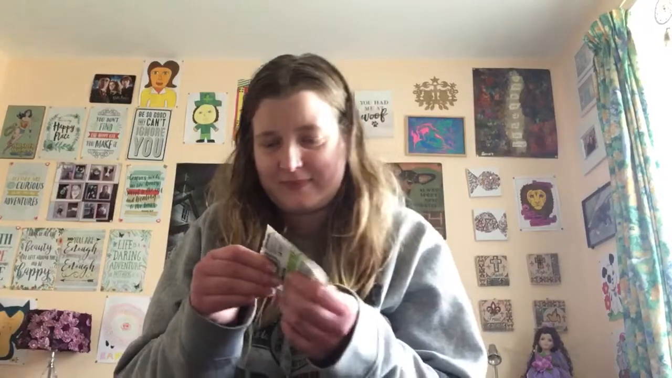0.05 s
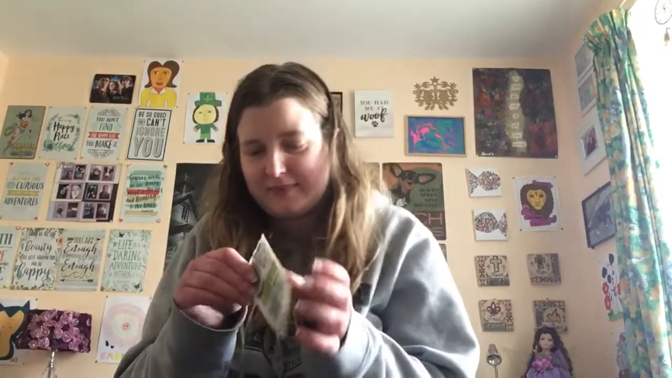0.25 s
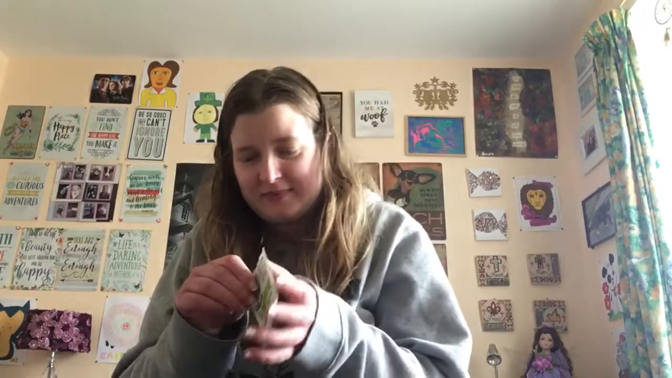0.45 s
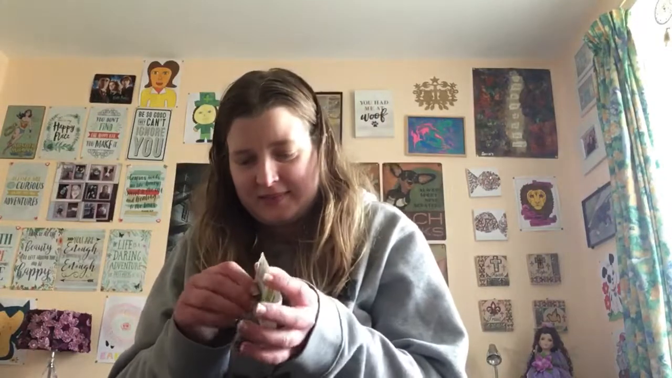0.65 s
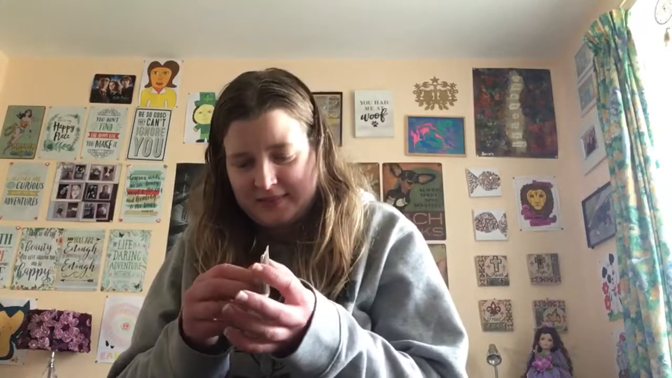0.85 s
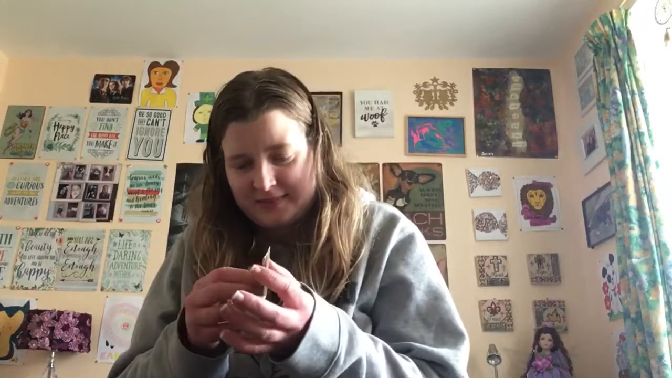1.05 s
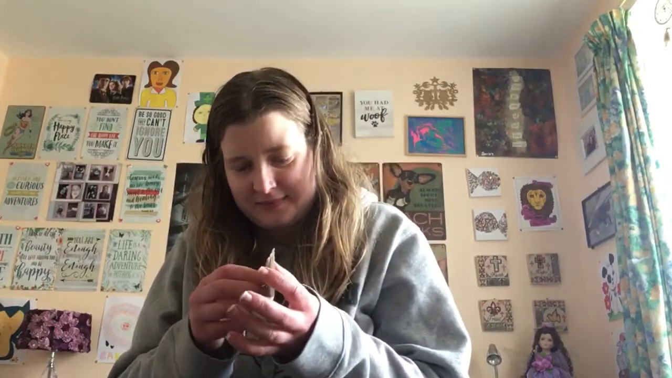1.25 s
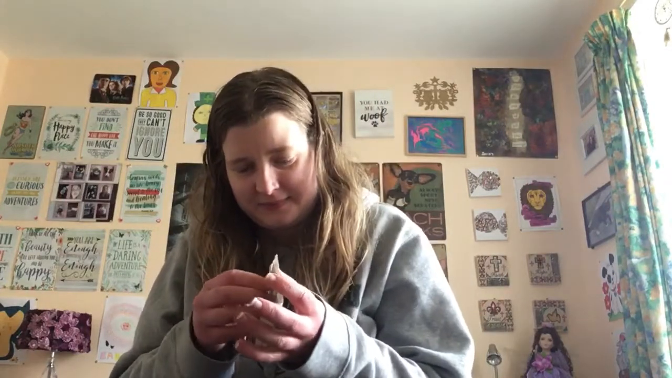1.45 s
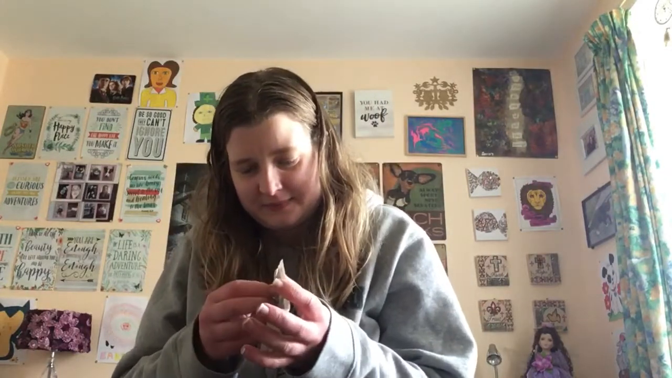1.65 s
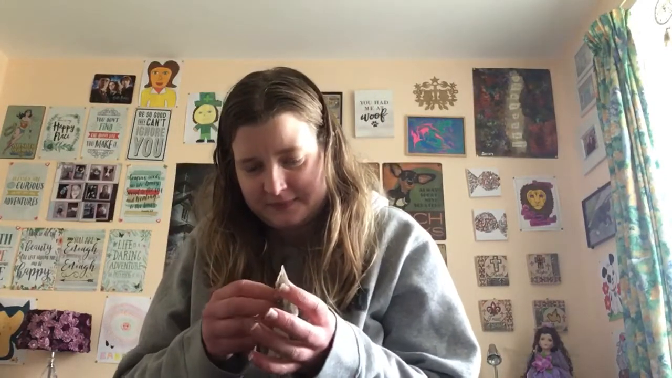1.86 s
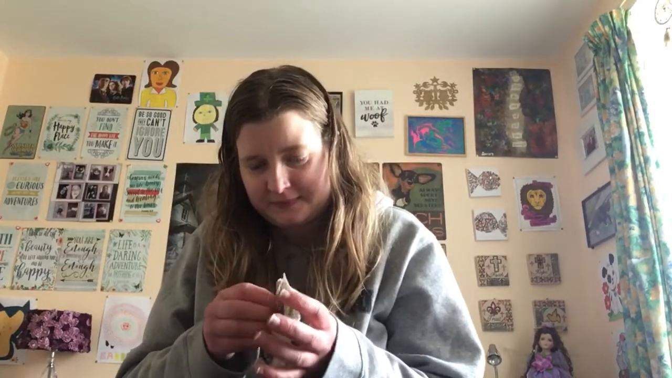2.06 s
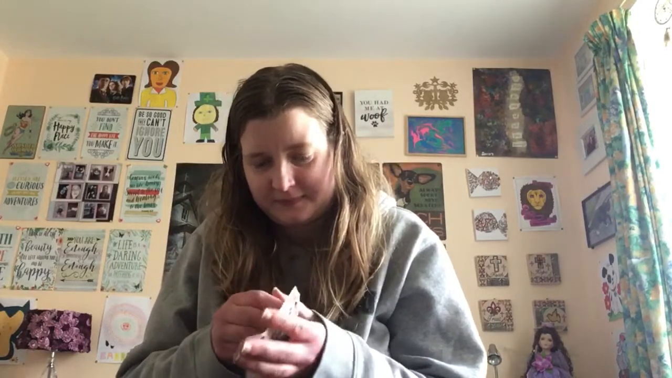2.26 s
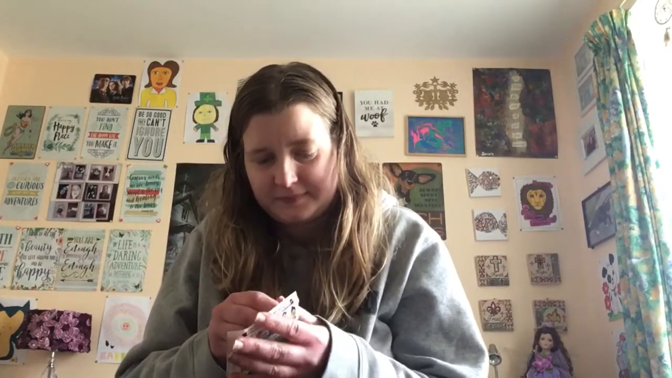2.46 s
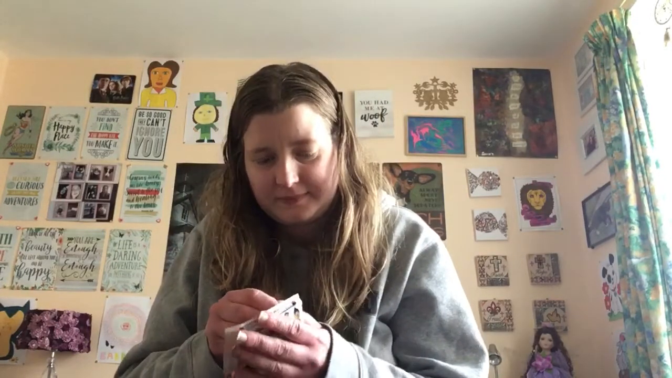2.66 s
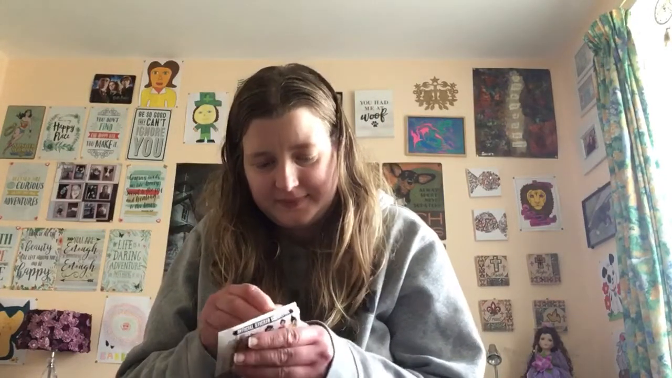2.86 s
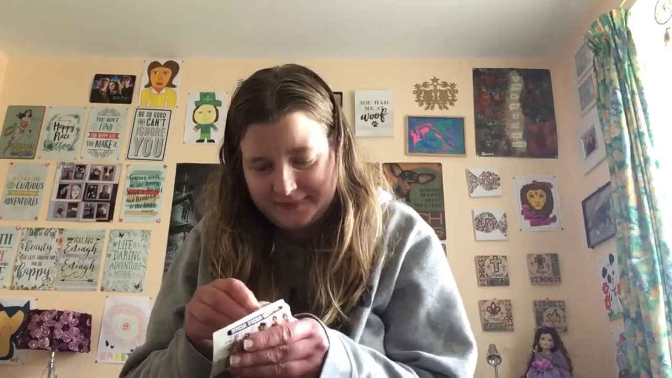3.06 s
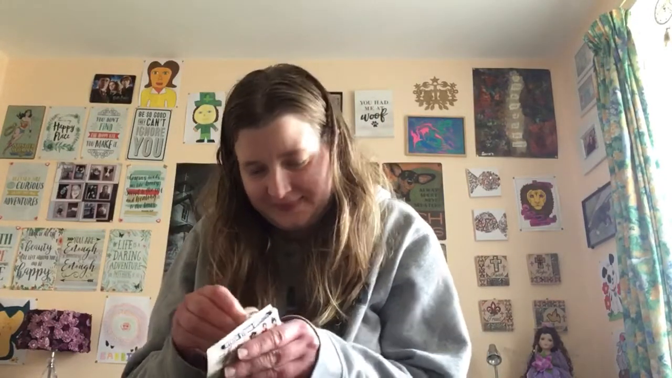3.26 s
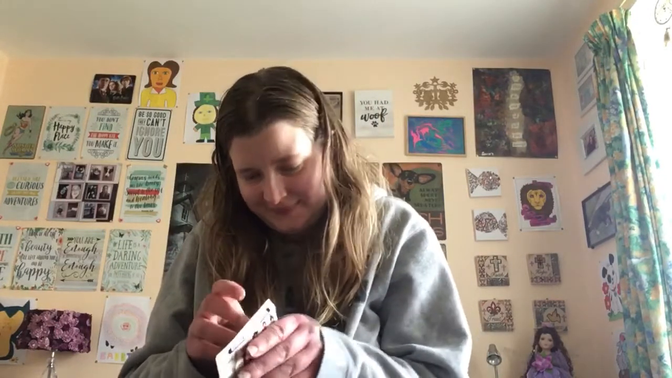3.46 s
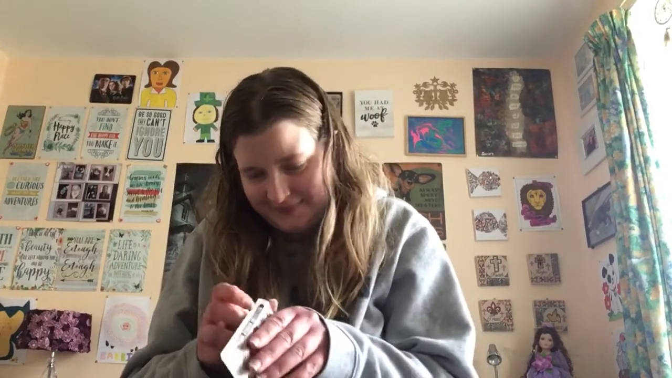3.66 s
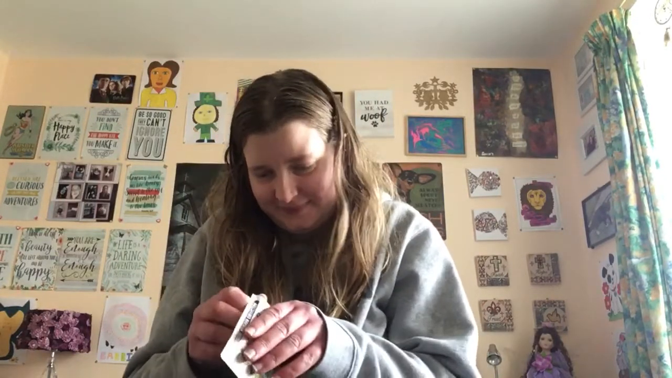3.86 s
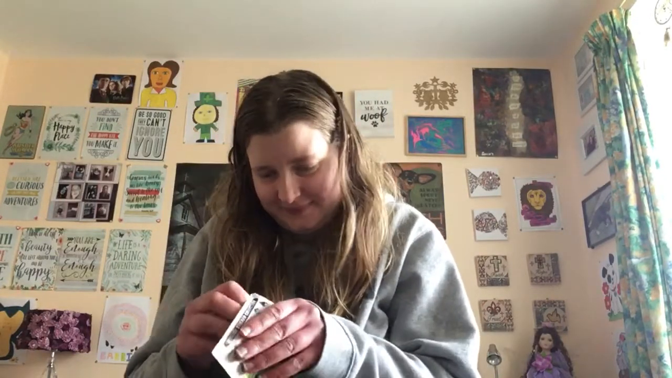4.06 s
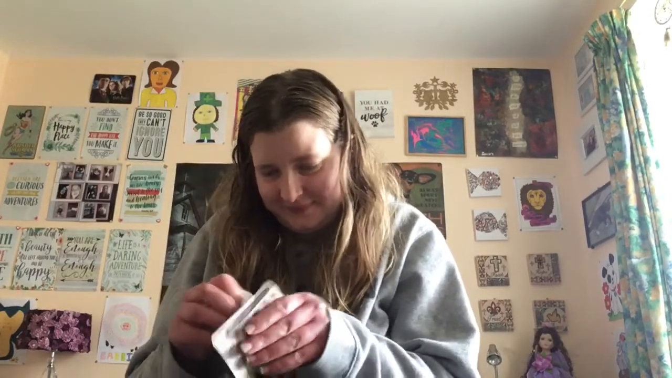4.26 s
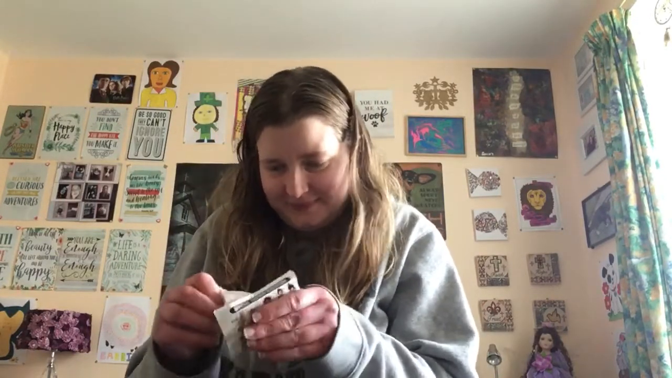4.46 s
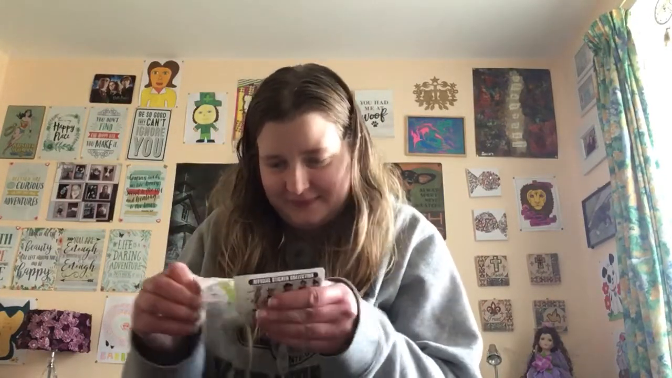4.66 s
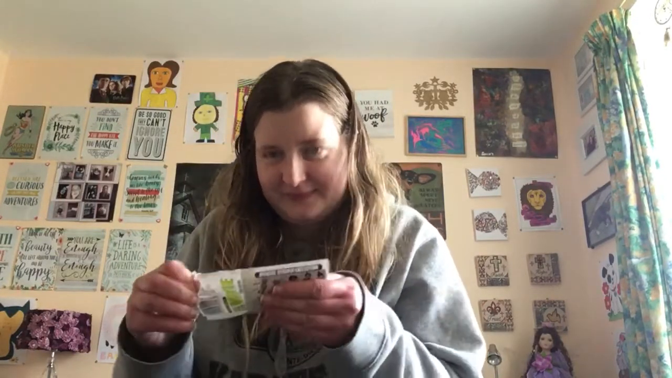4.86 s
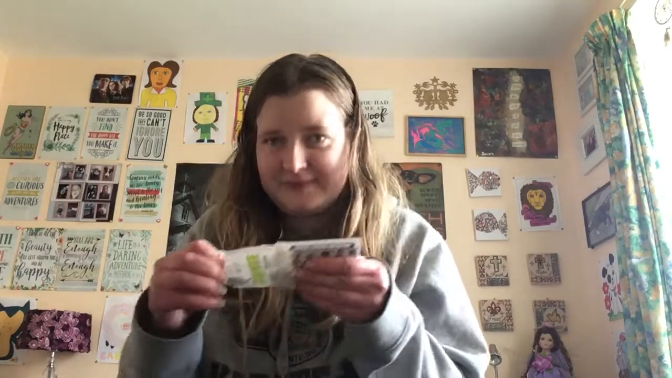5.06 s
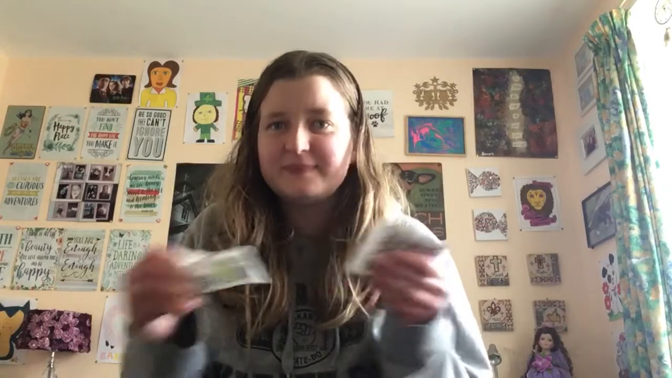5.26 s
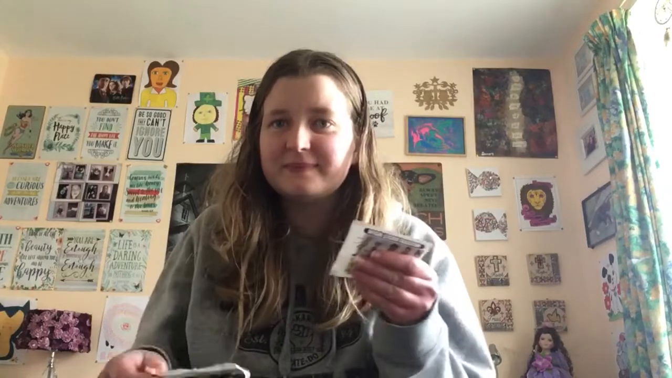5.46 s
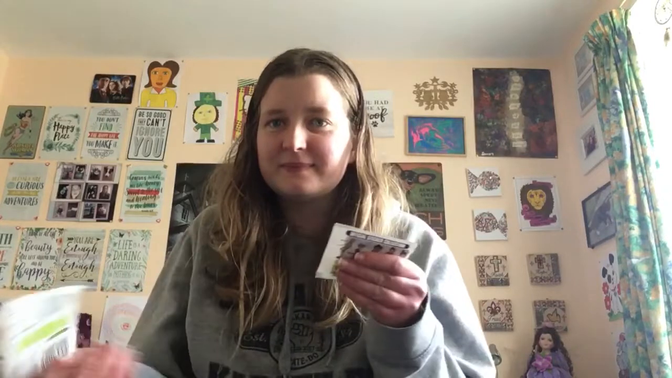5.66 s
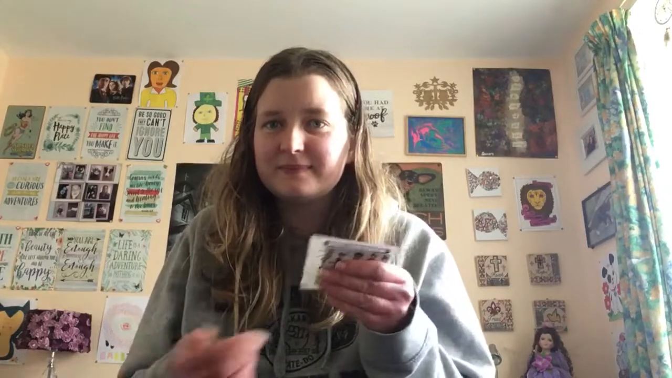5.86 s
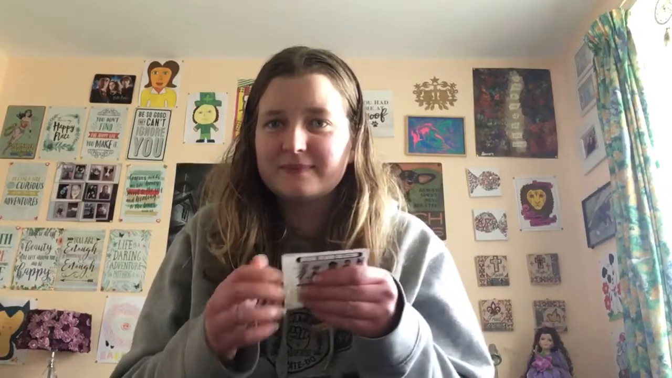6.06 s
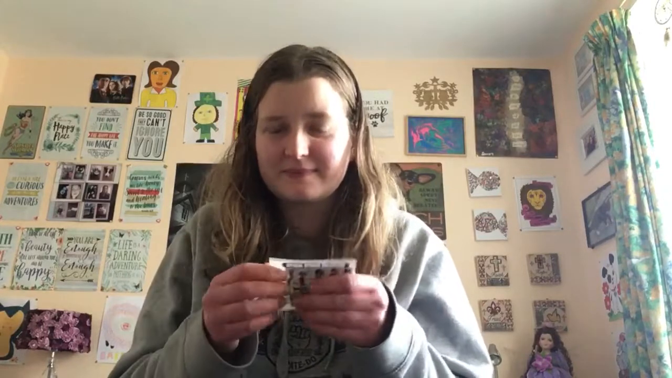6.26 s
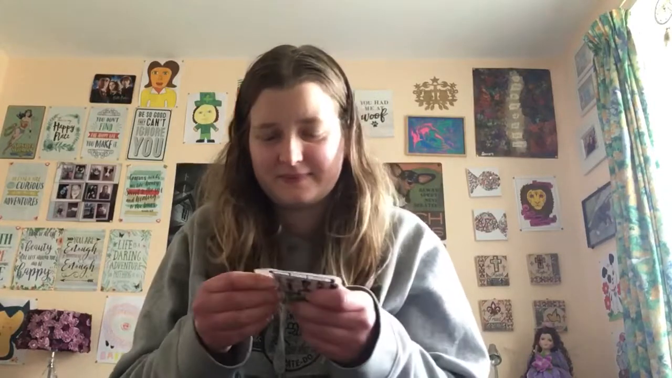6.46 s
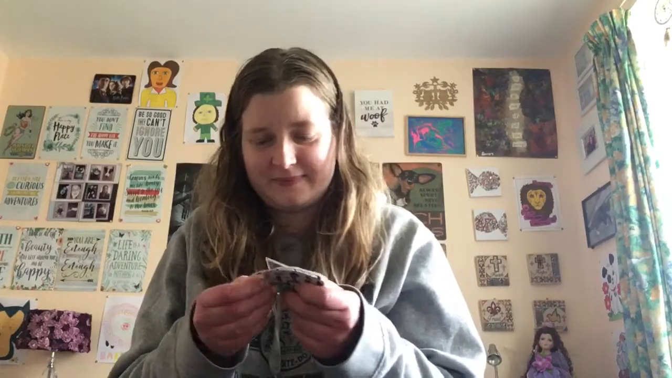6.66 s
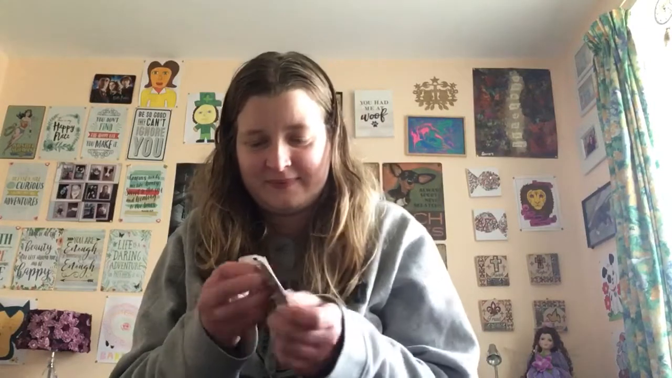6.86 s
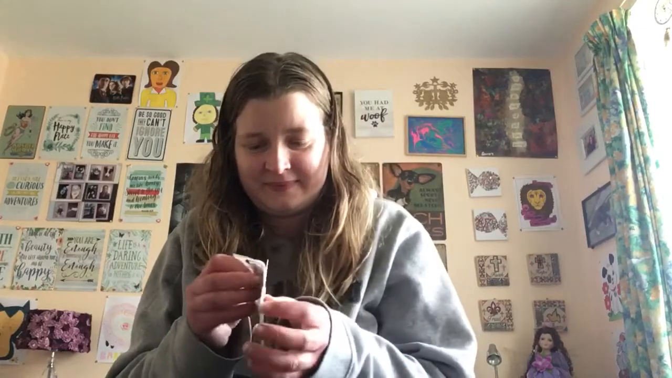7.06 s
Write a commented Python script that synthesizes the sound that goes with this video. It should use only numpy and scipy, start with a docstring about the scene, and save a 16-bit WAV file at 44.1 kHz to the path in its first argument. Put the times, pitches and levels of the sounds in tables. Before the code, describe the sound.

A paper sticker packet is handled close to the microphone in a small, quiet room. For the first half second it rustles softly as it is turned over, with a few crisp ticks. Sparse, faint crackles follow, with a brief lull around 1.5 seconds. From about 2.5 seconds the crinkling grows busier, with sharp crease snaps and fingers rubbing the paper. Between 4.2 and 5.2 seconds the wrapper tears off in four short, crackling rips, the second strongest, with the loudest snap near 4.7 seconds and a faint puff of air from the loose sheet. Light ticks follow as the stickers are handled. From about 6 seconds they rub and crackle softly, with a small cluster near 6.5 seconds and one sharper snap at 7 seconds. Each sound has a very short room tail over a faint, steady low rumble.

```python
"""A small quiet room, where a paper sticker packet is handled and torn open close to the microphone. Its
creases buckle with sharp snaps, each ringing the panel beside it. The wrapper comes off in four pulls, fibre
breaking after fibre, and the stickers are drawn out and sorted with a rustle of friction. The loose sheet
pushes soft puffs of air, and the wrapper drops onto the table with a soft thump. Ceiling and wall reflect it
all, and a short diffuse tail dies into the low rumble of the house."""
import sys
import numpy as np
from scipy import signal
from scipy.fft import rfft, irfft
from scipy.io import wavfile
from scipy.ndimage import uniform_filter1d

SR = 44100
rng = np.random.default_rng(int(sys.argv[2]) if len(sys.argv) > 2 else 0)


def inscribe(sig):
    """Save sig as 16-bit PCM at rate SR to the path in sys.argv[1].

    A 1-D sig is mono; a 2-D sig holds one channel per row.
    Samples are clipped to [-1, 1] before scaling.
    """
    pcm = np.round(np.clip(np.atleast_2d(sig).T, -1, 1) * 32767)
    wavfile.write(sys.argv[1], SR, pcm.astype(np.int16))


N = 313992
TIME = np.arange(N) / SR

# Pulls that rip the wrapper and draw it off: start_s, swell_s, hold_s, release_s, body_db, treble_re_body_db
PULLS = [(4.215, 0.02, 0.10, 0.029, -36.5, -5), (4.455, 0.14, 0.045, 0.038, -33, -3.5),
         (4.85, 0.071, 0.01, 0.12, -46, 0.5), (5.065, 0.051, 0.0745, 0.0052, -38, -2)]
# Fingers rubbing the seam and the stickers: middle_s, half_length_s, body_db, treble_re_body_db
RUBS = [(1.878, 0.094, -78, 3), (2.135, 0.095, -78, 6.5), (2.286, 0.067, -71.5, 5), (2.608, 0.11, -69, 6.5),
        (2.893, 0.056, -72, 8.5), (3.121, 0.061, -62.5, 2), (3.308, 0.023, -58.5, -7.5),
        (3.539, 0.098, -62, -4), (3.79, 0.12, -59.5, -5.5), (3.997, 0.14, -68.5, 1),
        (4.215, 0.044, -58.5, 1), (4.823, 0.042, -62, 2), (5.57, 0.028, -56.5, 0.5), (5.655, 0.05, -85, 12),
        (6.201, 0.13, -85, 0), (6.423, 0.034, -66.5, -11), (6.581, 0.08, -73, -16),
        (6.716, 0.03, -57.5, -12), (6.853, 0.092, -63, -4), (7.071, 0.1, -69, 0)]


def crease_snaps(size=2048, panel_q=4, ring_db=8.0, ripple_db=2.0):
    """Buckling: a crease gives way in a quick run of clicks, and the panel beside it resonates briefly."""
    # Buckling creases: start_s, level_db, ring_hz, thud_re_level_db, crack_re_level_db
    creases = [(0.0396, -44.5, 7850, -21, 3), (0.1074, -43.5, 3640, -21, 0), (0.1713, -39.5, 2100, -7, -23),
               (0.194, -47, 2390, 3, 0), (0.3707, -36.5, 3740, 10, -5), (0.738, -48, 8300, -26, 2),
               (0.9224, -42, 9900, -9, 6.5), (0.937, -49, 2970, 7.5, 6), (1.065, -44, 3000, -32, -3.5),
               (1.1613, -51, 1420, 0, -27), (1.7872, -56, 602, 4, -14), (1.858, -45, 6160, -21, -9.5),
               (1.9331, -42.5, 7000, -18, -2.5), (2.0069, -41, 1670, -4.5, 4),
               (2.4291, -47.5, 6400, -19, 3), (2.4924, -49.5, 7700, -16, 4), (2.574, -36, 6420, -2, -6),
               (2.5821, -35.5, 6400, -8, -7), (2.598, -36, 1750, 2, 1), (2.6353, -22.5, 7500, -7, -7),
               (2.68, -51, 955, 12, 2), (2.7652, -48, 2820, -12, 1.5), (2.787, -50.5, 930, 6, -16),
               (2.8191, -33.5, 1140, 7, 1.5), (2.8765, -32.5, 8850, 3, -1), (2.978, -51.5, 1280, -3, -12),
               (3.086, -22.5, 7750, -1.5, 1.5), (3.169, -39.5, 1800, 2, -33),
               (3.245, -39.5, 3080, -26, -20), (3.272, -49.5, 1620, 11, -2), (3.2956, -41, 1650, -4, -6),
               (3.321, -37, 2460, -3, -3.5), (3.4813, -33, 1120, 4, -0.5), (3.565, -25, 3280, -15, 1),
               (3.679, -28, 372, 0.5, -1), (3.7263, -31, 11900, -22, -1), (3.826, -35, 7050, -6, 0.5),
               (3.8396, -27, 6860, -57, 1.5), (3.8666, -37.5, 1130, 7, 4), (3.92, -35, 6200, -39, 6.5),
               (3.9504, -46.5, 6550, -2, 10.5), (4.0479, -48, 7070, 7.5, 5.5),
               (4.0877, -28, 6260, -16.5, -0.5), (4.142, -32.5, 6270, -28, 1.5), (4.1877, -49, 377, 13, -5),
               (4.2262, -22.5, 1700, -3, -0.5), (4.247, -19, 1920, -13, -12),
               (4.3583, -23, 7700, -5.5, -5.5), (4.4594, -20.5, 3060, -9.5, -12.5),
               (4.599, -30, 5800, -15, -5), (4.6654, -26.5, 6160, -6, 8), (4.6872, -13.5, 7660, -4, -5),
               (4.7353, -32.5, 1410, 10.5, -2), (4.8395, -35.5, 1520, 9, -12), (4.865, -20, 8200, -1, -1.5),
               (4.9202, -29.5, 9800, 9, 0), (4.9659, -28.5, 3140, -14, -1), (5.0055, -36.5, 3550, -16, 0),
               (5.1599, -29.5, 1060, 6, 7.5), (5.184, -20.5, 2230, -10.5, 2),
               (5.2781, -42.5, 3430, -13, -16), (5.4282, -42, 4700, -26, -2.5), (5.515, -41, 1220, -6, 2),
               (5.5496, -48, 1090, 1, 1), (5.573, -39, 10500, -9, 5.5), (5.8984, -45.5, 6070, -10, 4),
               (5.9, -34.5, 12600, 5, 3.5), (6.077, -36.5, 2000, 2, -14), (6.098, -44, 3580, -14, -10.5),
               (6.1253, -55.5, 1400, 14.5, -19), (6.187, -48.5, 780, 10.5, -27),
               (6.251, -48.5, 1420, 14, -27), (6.393, -43.5, 1360, 8, -13), (6.4421, -33.5, 2160, 3.5, 1),
               (6.5102, -29, 1620, -7.5, -15.5), (6.519, -31.5, 2000, -7, -13.5),
               (6.557, -48, 1420, -1, -2), (6.607, -51.5, 1250, 11.5, -9), (6.7174, -33.5, 12000, -6, 3),
               (6.7371, -45.5, 7400, -14, 11), (6.9188, -40, 7750, -5, -6.5), (6.95, -50.5, 3420, -4, -2),
               (7.0177, -22.5, 3460, -42, 2), (7.0778, -43.5, 2200, -3.5, -20),
               (7.0986, -39, 6290, -17, -12)]
    # Centres of a snap's thud, knock, middle and crack: frequency_hz
    parts_hz = [550, 1400, 3300, 7500]
    # Spectrum of snapping paper: frequency_hz, gain_db
    paper_colour = [(100, -44.5), (200, -11), (330, -2.5), (540, 5.5), (740, -0.5), (1100, 4.5),
                    (2400, 1.5), (3300, 1.5), (4600, -0.5), (6500, 2.5), (9500, -2.5), (12000, -5),
                    (15500, -3.5)]
    t = np.arange(size) / SR
    hz = np.linspace(1, SR / 2, size // 2 + 1)
    mode_hz = np.geomspace(300, 16000, 40)
    effort = pull_envelopes(PULLS)[0]
    effort /= effort.max()
    out = np.zeros(N + size)
    for start, level, ring_hz, thud, crack in creases + faint_creases():
        at = round(start * SR)
        # A larger panel rings lower, knocks harder, buckles more slowly and has less treble.
        octaves_lower = np.log2(3070 / ring_hz)
        knock = 2.5 + 2.1 * octaves_lower + 0.29 * thud
        edge_hz = 11900 * 2 ** (-0.15 * octaves_lower)
        buckle_s = 0.00076 * 2 ** (0.42 * octaves_lower)
        buckle_s += 0.0033 * effort[at]   # a hard pull draws the buckling out
        flutter = 0.11 * np.exp(-t / 0.0013)
        clicks = rng.standard_normal(size) * (np.exp(-t / buckle_s / 2) + flutter)
        clicks[0] += 0.97   # the first click
        # The clicks keep only their fine ripple; the broad colour belongs to the paper.
        clicks_db = 10 * np.log10(uniform_filter1d(abs(rfft(clicks)) ** 2, 50))
        paper_db = at_hz(paper_colour, hz) + at_hz(list(zip(parts_hz, [thud, knock, 0, crack])), hz)
        edge_db = -10 * np.log10(1 + (hz / edge_hz) ** 10)
        # Every grip bends the sheet differently, so every snap has modes of its own.
        modes = list(zip(mode_hz, ripple_db * rng.standard_normal(len(mode_hz))))
        panel_db = ring_db / (1 + (panel_q * (hz / ring_hz - ring_hz / hz)) ** 2)
        response = minimum_phase(level + paper_db + edge_db + at_hz(modes, hz) + panel_db - clicks_db)
        out[at:at + size] += signal.fftconvolve(clicks, response)[:size]
    return from_db(1.18) * np.sqrt(SR / 1000) * out[:N]   # scaled to the energy of a 1 ms burst


def faint_creases(per_rub=2, level_db=-56, spread_db=5, low_hz=1030, high_hz=7750):
    """Random buckling: each rub trips faint creases on panels of any size, as rows for crease_snaps."""
    middle, half = np.repeat(np.array(RUBS)[:, :2], per_rub, axis=0).T
    when, strength, panel = rng.uniform(-1, 1, (len(middle), 3)).T
    starts = np.clip(middle + half * when, 0, TIME[-1])
    levels = level_db + spread_db * strength
    ring_hz = low_hz * (high_hz / low_hz) ** ((panel + 1) / 2)
    return [(start, level, hz, 0, 1) for start, level, hz in zip(starts, levels, ring_hz)]


def wrapper_tear():
    """Fracture: the rip runs through the wrapper, breaking thousands of fibres a second."""
    # Spectrum of tearing paper: frequency_hz, gain_db
    tear_colour = [(70, -12), (180, -12), (330, -0.5), (540, 0), (720, -2.5), (950, 3.5), (1400, 4.5),
                   (2200, -0.5), (3200, 0.5), (4400, -4.5), (6200, -2), (9500, -6), (15500, -12)]
    drive = fibre_clicks(per_s=3500, spread_db=2.5, clump_db=2.5, clumps_per_s=350, hiss=0.43)
    return sheet_radiation(drive, tear_colour, pull_envelopes(PULLS), body_db=-0.65, treble_db=-0.1)


def rustle():
    """Sliding friction: skin and stickers drag over the paper with a fine, soft grain."""
    # The packet turned over in the hands: start_s, swell_s, hold_s, release_s, body_db, treble_re_body_db
    turns = [(-0.02, 0.015, 0.014, 0.13, -58.5, -2.5), (0.09, 0.017, 0.02, 0.14, -56, 3.5),
             (0.19, 0.12, 0.086, 0.075, -52, 0.5), (0.8, 0.055, 0.065, 0.1, -85, 13.5)]
    # Spectrum of the turning packet: frequency_hz, gain_db
    turn_colour = [(90, -14), (190, -7), (310, 4), (500, 1.5), (720, -1.5), (1250, 5), (1900, 0),
                   (3000, 4.5), (4000, -5.5), (6500, -7), (9500, -10.5), (15500, -16)]
    # Spectrum of rubbed paper: frequency_hz, gain_db
    rub_colour = [(90, -9), (180, -8.5), (320, 5.5), (500, -3.5), (720, -2), (1200, 5.5), (2000, 0.5),
                  (3000, 4), (4300, 0), (6500, 4.5), (9500, -2.5), (15500, -13)]
    drive = fibre_clicks(per_s=600, spread_db=3.0, clump_db=2.0, clumps_per_s=90, hiss=1.0)
    turning = sheet_radiation(drive, turn_colour, pull_envelopes(turns), body_db=-1.0, treble_db=-3.0)
    rubbing = sheet_radiation(drive, rub_colour, rub_envelopes(RUBS), body_db=3.4, treble_db=2.8)
    return turning + rubbing


def fibre_clicks(per_s, spread_db, clump_db, clumps_per_s, hiss):
    """Shot noise: fibres let go in random clumps, a few large among many small, over smooth friction."""
    sizes = from_db(spread_db * np.minimum(rng.exponential(1, N), 4))
    signs = rng.choice([-1, 1], N)
    lets_go = rng.random(N) < per_s / SR
    grains = unit_rms(sizes * signs * lets_go)
    friction = hiss * rng.standard_normal(N)
    return (grains + friction) * from_db(clump_db * drift(clumps_per_s))


def sheet_radiation(drive, colour, stroke, body_db, treble_db, crossover_hz=3500):
    """Source and filter: the sheet colours the fibres' clicks; the stroke sets level and crispness."""
    body_gain, treble_gain = stroke
    sound = coloured(drive, colour)
    body = unit_rms(butterworth(sound, 3, crossover_hz, "low"))
    treble = unit_rms(butterworth(sound, 3, crossover_hz, "high"))
    return body * body_gain * from_db(body_db) + treble * treble_gain * from_db(treble_db)


def pull_envelopes(rows):
    """Incoherent sum: strokes swell, hold and decay, adding in power to give body and treble gains."""
    power = np.zeros((2, N))
    for start, swell, hold, release, db, crisp in rows:
        rise = np.clip((TIME - start) / swell, 0, 1)
        fall = np.exp(-np.maximum(TIME - start - swell - hold, 0) / release)
        power += (from_db([[db], [db + crisp]]) * rise * fall) ** 2
    return np.sqrt(power)


def rub_envelopes(rows, roundness=1.52):
    """Incoherent sum: rubs grow and fade symmetrically, adding in power to give body and treble gains."""
    power = np.zeros((2, N))
    for middle, half, db, crisp in rows:
        bell = np.exp(-(abs(TIME - middle) / half) ** roundness)
        power += (from_db([[db], [db + crisp]]) * bell) ** 2
    return np.sqrt(power)


def sheet_flaps():
    """Air displacement: each swing of the loose sheet, and the wrapper dropped onto the table, pushes out a
    soft, low puff."""
    # Puffs of air from the sheet's swings, the last one from the wrapper dropped on the table: middle_s,
    # level_db, half_length_s
    puffs = [(0.29, -58, 0.11), (4.656, -59.5, 0.059), (5.153, -51.5, 0.057), (5.903, -59, 0.011)]
    # Spectrum of the pushed air: frequency_hz, gain_db
    puff_colour = [(35, -3.5), (70, 1.5), (130, -7.5), (220, 6.5), (330, 4.5), (500, -6), (1000, -69)]
    envelope = sum(from_db(db) * np.exp(-((TIME - middle) / half) ** 2) for middle, db, half in puffs)
    return from_db(-0.5) * envelope * unit_rms(coloured(rng.standard_normal(N), puff_colour))


def reflections(x, ceiling_s=0.0077, ceiling_db=-20.5, wall_s=0.0118, wall_db=-41.0):
    """Specular reflection: ceiling and wall each return one delayed, weaker copy."""
    ceiling, wall = [np.pad(x, (round(delay * SR), 0))[:N] for delay in (ceiling_s, wall_s)]
    return from_db(ceiling_db) * ceiling + from_db(wall_db) * wall


def reverberation(x, tail_db=-7.5, build_s=0.0044, lumpy_db=2.0, hop=6144):
    """Diffuse field: scattered sound builds up, then decays exponentially at each band's own rate."""
    # Reverberation time of the room: frequency_hz, t60_s
    decay_times = [(200, 0.098), (550, 0.26), (1400, 0.12), (3600, 0.21), (8000, 0.18), (15000, 0.22)]
    edges_hz = np.geomspace(60, 17000, 13)
    centres_hz = np.sqrt(edges_hz[1:] * edges_hz[:-1])
    t = np.arange(SR // 3) / SR
    scatter = rng.standard_normal(N) * from_db(lumpy_db * drift(900))
    # Signs alternate so that neighbouring bands add up.
    bands = np.array([(-1) ** k * butterworth(scatter, 2, edges_hz[k:k + 2], "band")
                      for k in range(len(centres_hz))])
    build_up = 1 - np.exp(-(t / build_s) ** 2)
    envelopes = build_up * from_db(-60 * t / at_hz(decay_times, centres_hz)[:, None])
    padded = np.pad(x, (hop, 2 * hop))
    window = signal.windows.cosine(2 * hop)
    out = np.zeros(len(padded) + len(t))
    # The hands keep moving, so the pattern of the tail is new from moment to moment.
    for at in range(0, N + hop, hop):
        pick = rng.integers(N - len(t))
        tail = (bands[:, pick:pick + len(t)] * envelopes).sum(axis=0)
        tail = unit_rms(tail) / np.sqrt(len(t))   # unit energy
        wet = signal.fftconvolve(padded[at:at + 2 * hop] * window, tail)
        out[at:at + len(wet)] += wet
    return from_db(tail_db) * out[hop:hop + N]


def room_tone(level_db=-67):
    """Ambient noise: the steady low rumble of the house and a faint hiss."""
    # Spectrum of the quiet room: frequency_hz, gain_db
    ambient_colour = [(20, -15.5), (32, -10), (50, 1), (90, 2), (150, -5), (250, -8.5), (500, -16),
                      (800, -16), (1300, -15), (2500, -22), (5000, -27), (10000, -27.5), (15500, -34)]
    return from_db(level_db) * unit_rms(coloured(rng.standard_normal(N), ambient_colour))


def from_db(db):
    """Amplitude ratio of a level in decibels."""
    return 10 ** (np.asarray(db) / 20)


def unit_rms(x):
    """Normalisation of each row to rms 1."""
    return x / np.sqrt(np.mean(x ** 2, axis=-1, keepdims=True) + 1e-30)


def at_hz(points, hz):
    """Interpolation of a table along a log-frequency axis."""
    known_hz, values = np.transpose(points)
    return np.interp(np.log(hz), np.log(known_hz), values)


def drift(per_s):
    """Random modulation of rms 1, gliding to a new value per_s times a second."""
    knots = rng.standard_normal(N // 20)
    return unit_rms(np.interp(TIME * per_s, np.arange(len(knots)), knots))


def butterworth(x, order, hz, kind):
    """Filtering with a maximally flat passband."""
    return signal.sosfilt(signal.butter(order, hz, kind, fs=SR, output="sos"), x)


def minimum_phase(db):
    """Minimum phase: the most prompt causal response with this spectrum (even steps, 0 Hz to SR / 2)."""
    cepstrum = irfft(np.log(from_db(db)))
    half = len(cepstrum) // 2
    cepstrum[1:half] *= 2
    cepstrum[half + 1:] = 0
    return irfft(np.exp(rfft(cepstrum)))


def coloured(x, colour, size=4096):
    """Convolution imposes a spectral colour on a sound."""
    gain_db = at_hz(colour, np.linspace(1, SR / 2, size + 1))
    return signal.oaconvolve(x, minimum_phase(gain_db))[:N]


def scene():
    """Superposition: the packet's direct sound, its reflections and reverberation, and the room tone."""
    direct = crease_snaps() + wrapper_tear() + rustle() + sheet_flaps()
    return (direct + reflections(direct) + reverberation(direct) + room_tone())[None]


def record(dry):
    """Band limiting: a steep low-pass cuts the treble above 16 kHz."""
    return signal.sosfilt(signal.ellip(10, 0.2, 80, 16000, fs=SR, output="sos"), dry)


dry = scene()
out = record(dry)
inscribe(out)
```